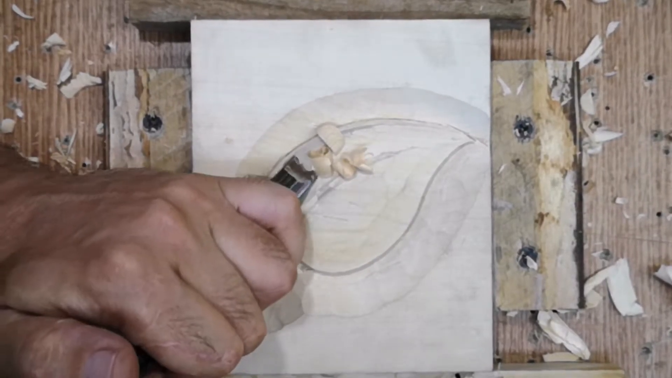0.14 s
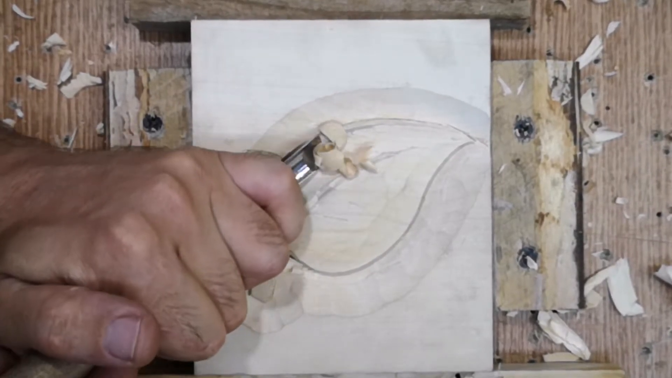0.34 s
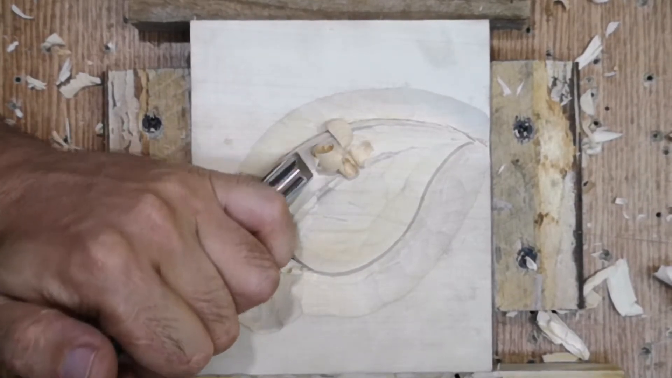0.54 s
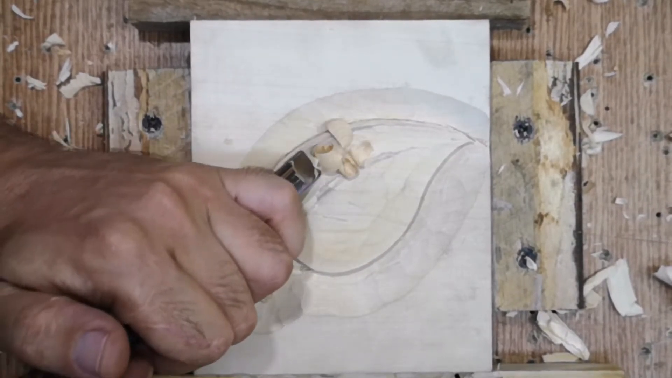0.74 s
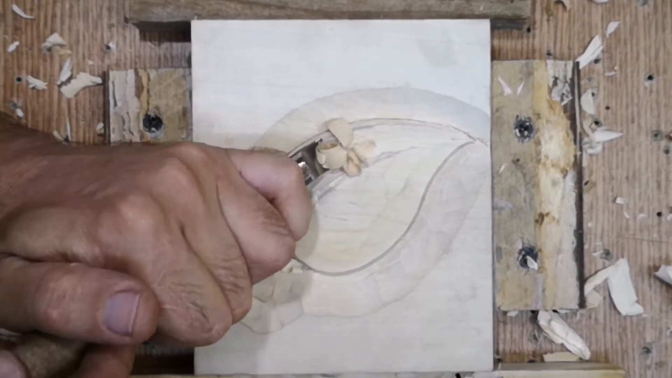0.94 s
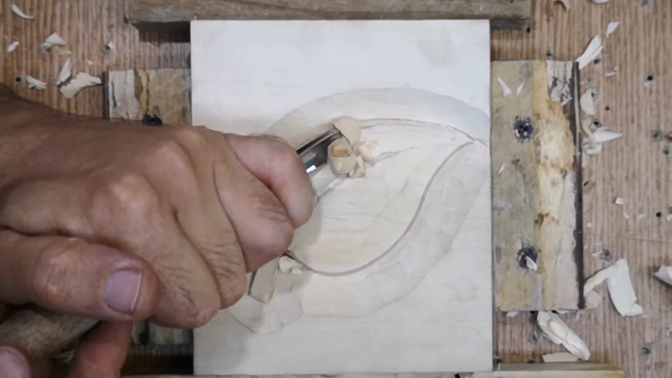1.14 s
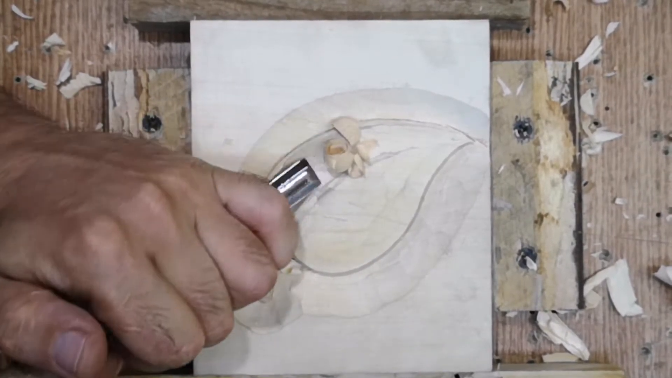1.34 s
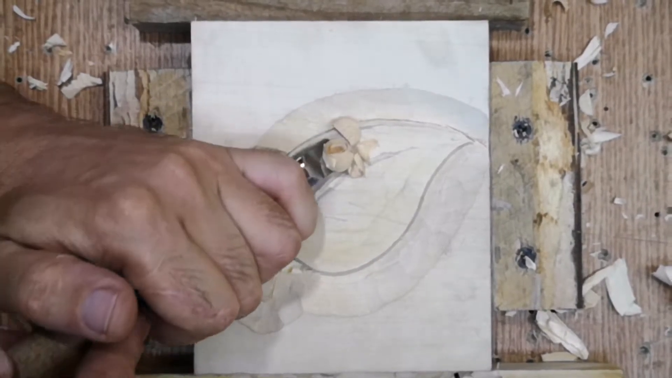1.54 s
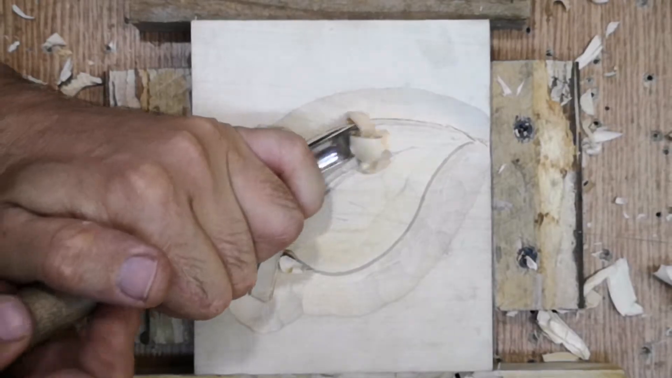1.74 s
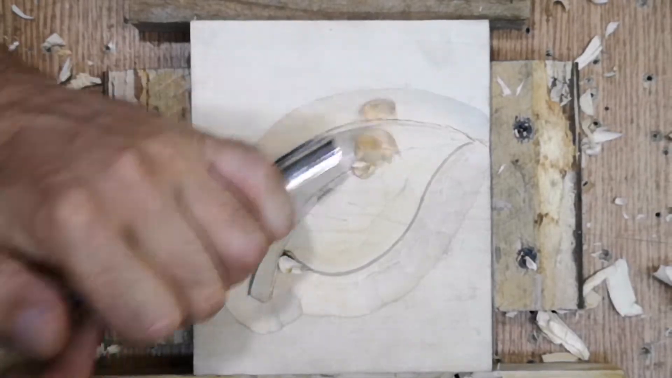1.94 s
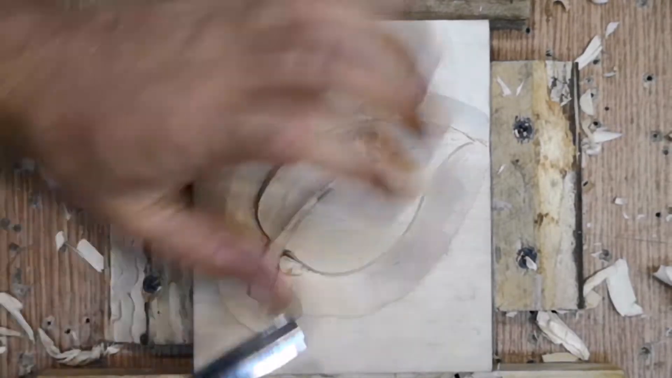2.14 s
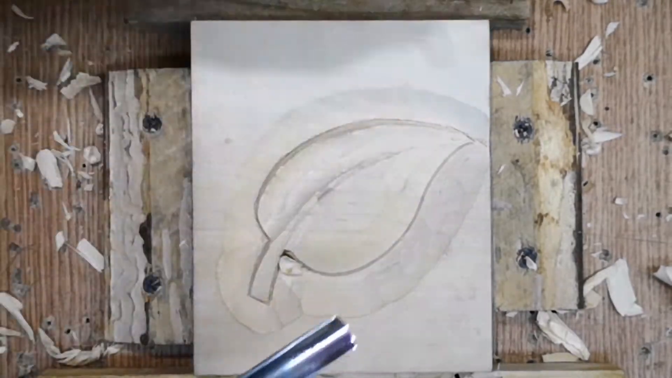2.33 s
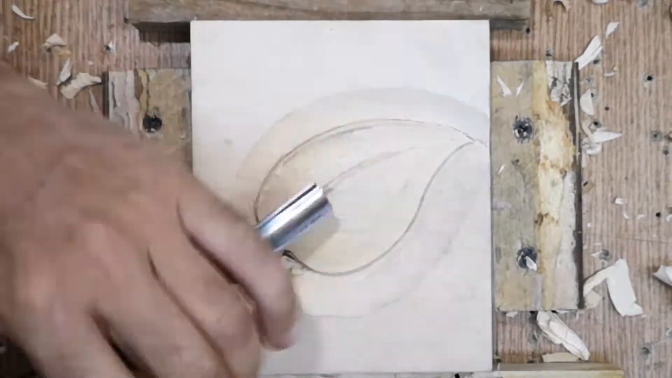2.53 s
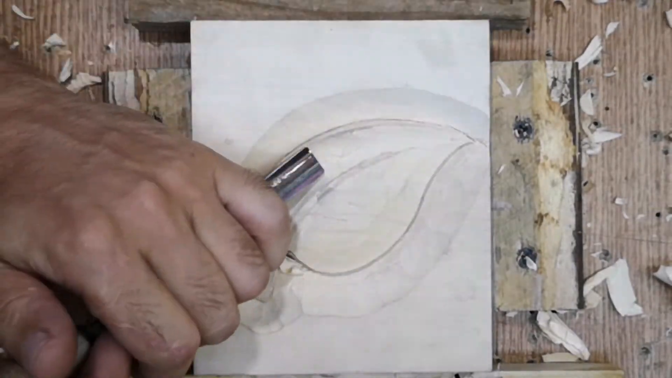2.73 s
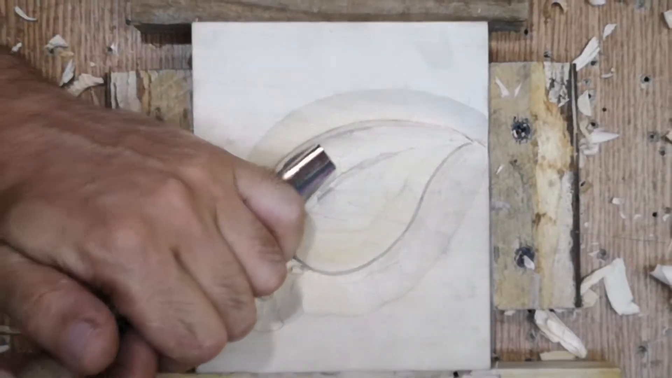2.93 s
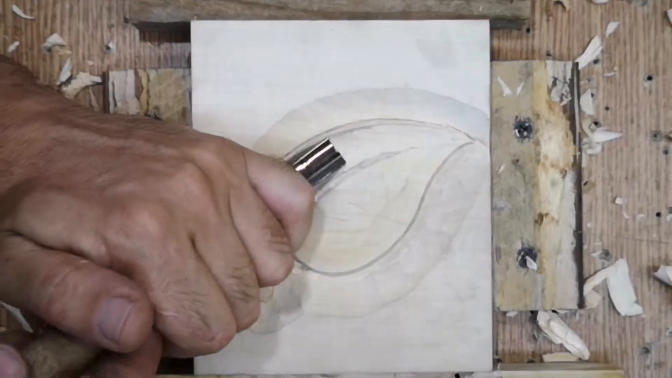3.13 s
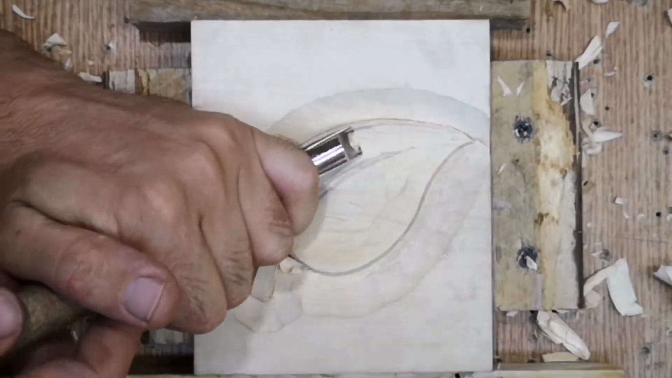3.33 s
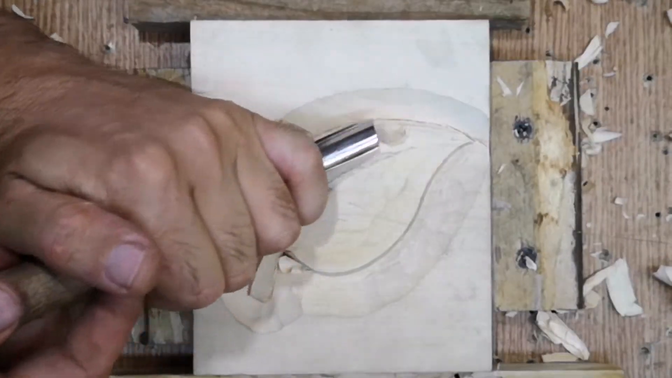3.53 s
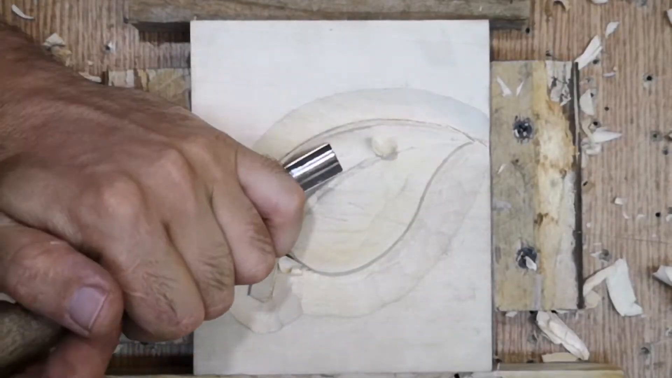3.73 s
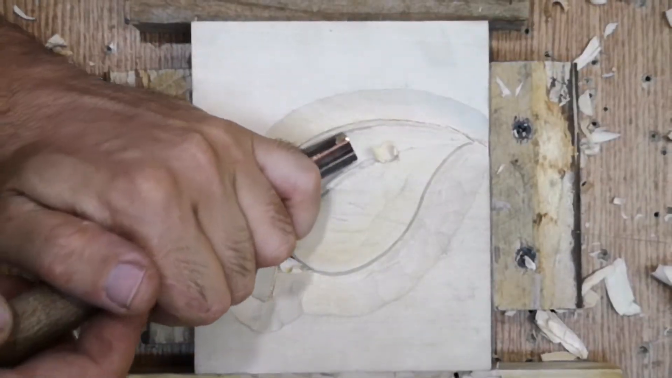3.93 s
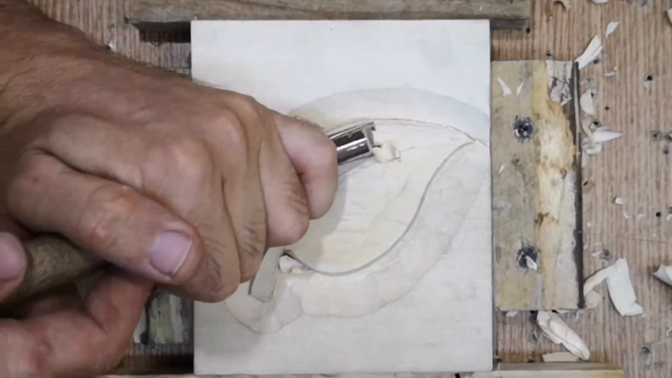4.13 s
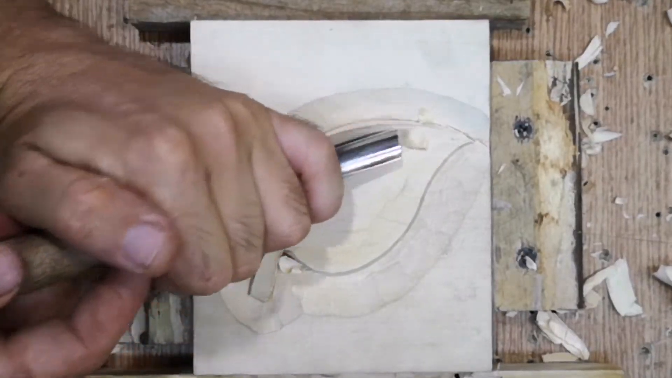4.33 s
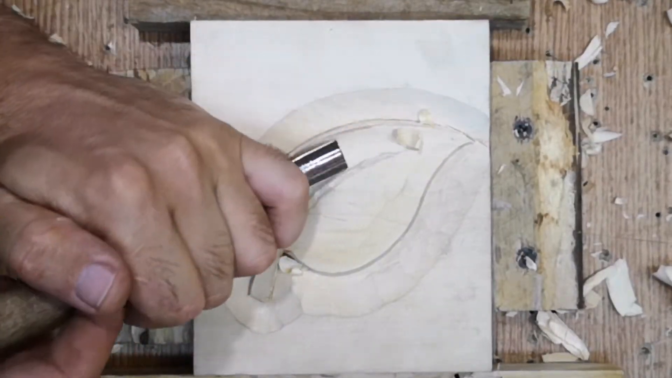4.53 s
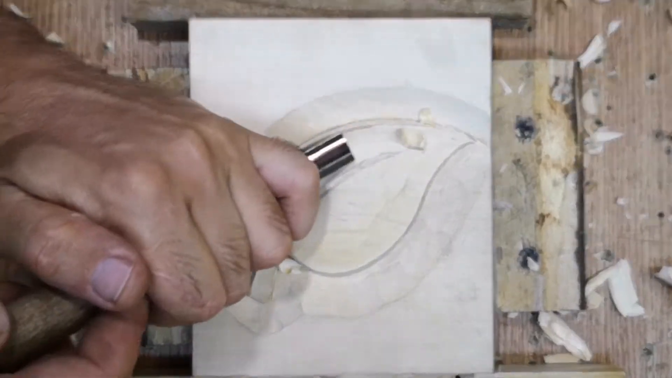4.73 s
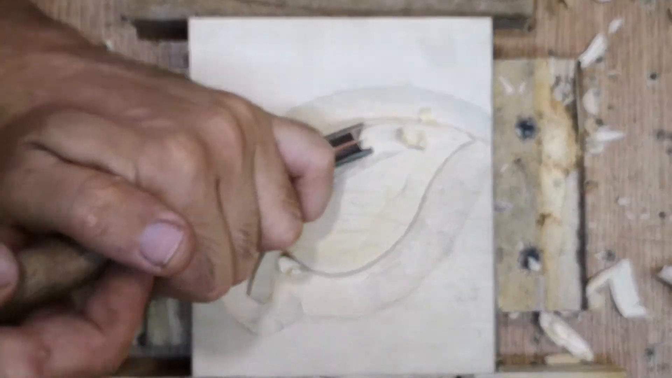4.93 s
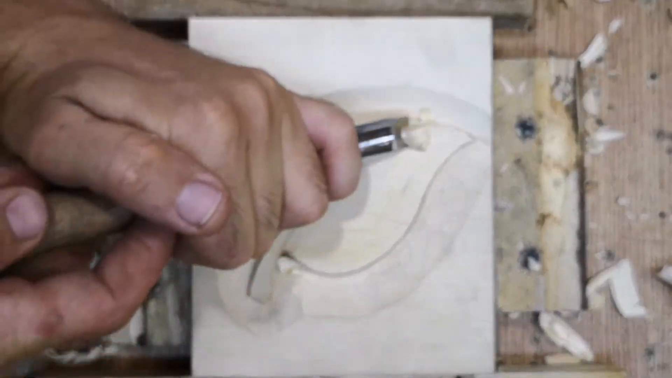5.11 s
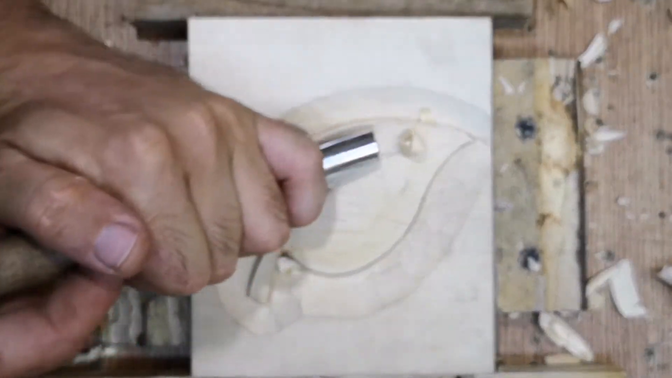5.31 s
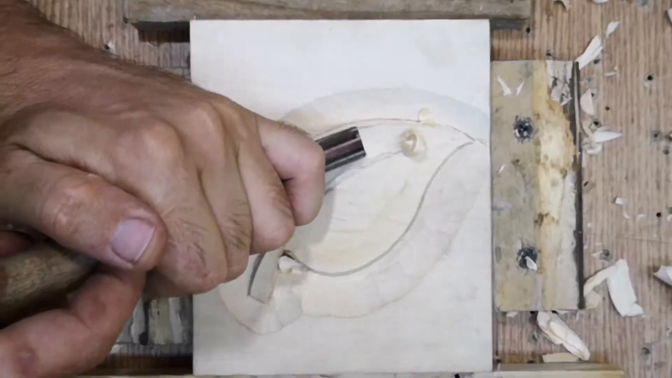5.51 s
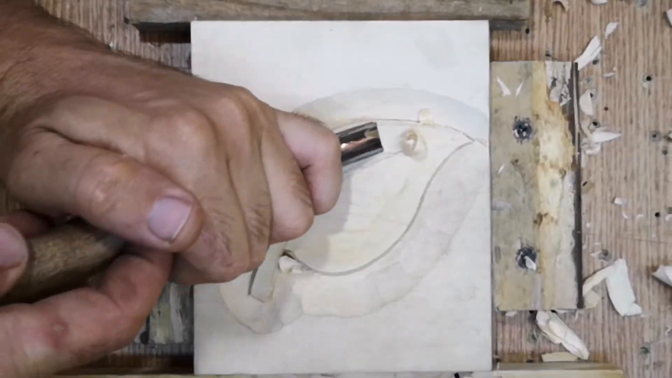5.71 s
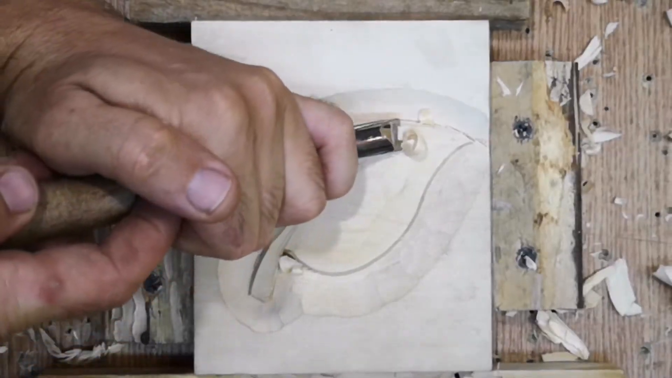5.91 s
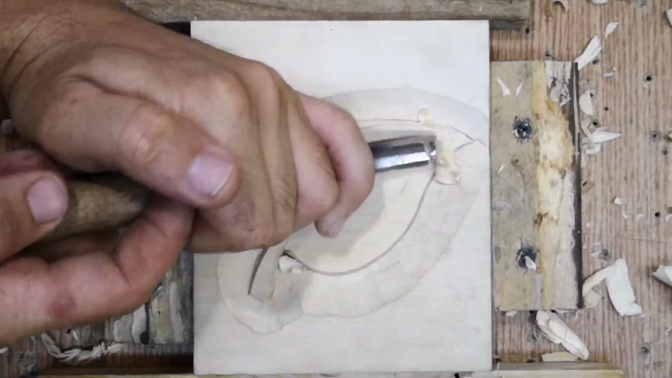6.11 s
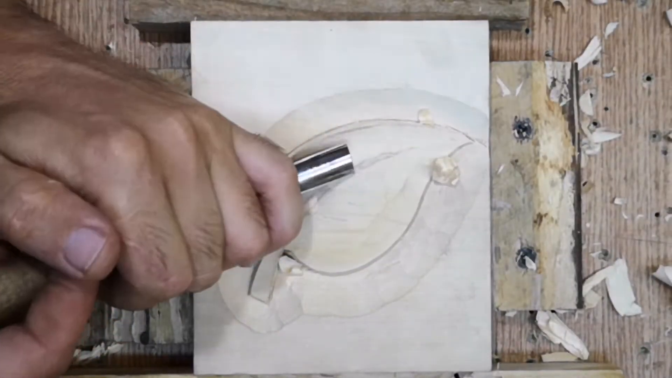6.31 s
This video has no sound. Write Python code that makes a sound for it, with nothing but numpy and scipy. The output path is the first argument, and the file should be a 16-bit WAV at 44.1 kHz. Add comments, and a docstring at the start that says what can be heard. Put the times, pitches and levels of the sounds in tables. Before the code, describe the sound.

A gouge rasps through soft wood in short crunchy pushes, with woody knocks between, a clumsy low bench thump and ticking chips, in a small quiet workshop.

```python
"""Short, rasping pushes of a gouge through a soft wood panel, clamped to a bench in a small workshop.
In each push, dense tiny fibre snaps ring the panel and the blade while the bench shudders.
Between pushes the tool knocks as it is set down; chips tick, and jolts of the hand shake the bench.
A finger brushes shavings away, the hand rustles on the handle, and near walls add a little echo
over a quiet background."""
import sys
import numpy as np
from scipy import signal
from scipy.fft import rfft, irfft
from scipy.io import wavfile
from scipy.ndimage import uniform_filter1d

SR = 44100
rng = np.random.default_rng(int(sys.argv[2]) if len(sys.argv) > 2 else 0)


def inscribe(sig):
    """Save sig as 16-bit PCM at rate SR to the path in sys.argv[1].

    A 1-D sig is mono; a 2-D sig holds one channel per row.
    Samples are clipped to [-1, 1] before scaling.
    """
    pcm = np.round(np.clip(np.atleast_2d(sig).T, -1, 1) * 32767)
    wavfile.write(sys.argv[1], SR, pcm.astype(np.int16))


N = 280476
TIME = np.arange(N) / SR
BLOW = TIME[:SR // 2]   # half a second, enough for one short event

# Pushes of the gouge. Each row: touch in seconds, then slide, bite and hold lengths in seconds,
# cut level in dB, change over the hold in dB, fade length in seconds,
# then relative levels of panel body, fibre tearing and bench sway in dB.
PUSHES = [(0.12, 0.11, 0.068, 0.043, -42, -1.5, 0.18, -0.5, -8, -8.5),
          (0.299, 0.04, 0.05, 0.067, -40.5, 0.5, 0.25, -5.5, -9, 1),
          (0.884, 0.084, 0.037, 0.044, -54, 0, 0.22, 3.5, -5, -8.5),
          (1.05, 0.046, 0.013, 0.15, -48, -7.5, 0.15, -3.5, -3.5, 6),
          (1.683, 0.12, 0.08, 0.12, -41, -6, 0.19, -0.5, -7.5, -6.5),
          (3.175, 0.2, 0.1, 0.072, -46, 5, 0.082, 1.5, -5.5, 3),
          (4.052, 0.14, 0.089, 0.04, -45.5, -0.5, 0.071, 2, -8.5, -2),
          (4.875, 0.14, 0.075, 0.11, -43.5, 3.5, 0.11, 1.5, -9, -1),
          (5.843, 0.15, 0.036, 0.11, -53, -2, 0.063, -1, -8, -3),
          (6.136, 0.037, 0.026, 0.012, -52.5, -1.5, 0.15, 6, -11, -1.5)]
# Ways the panel vibrates. Each row: pitch in Hz, relative level when scraped in dB, when struck in dB,
# time to fall 60 dB in seconds, left-right difference in dB, lead of the left side in radians.
PANEL_MODES = [(186.3, 5, -13.5, 0.22, 1.5, -0.34), (276.6, 2.5, -11.5, 0.19, 0.5, -0.5),
               (321, -5, -16, 0.046, -2.5, 0.75), (485, -1, -31, 0.053, -1, 1.72),
               (575.4, 2, -16.5, 0.075, 9.5, 2.5), (822, -8.5, -13.5, 0.039, 4, 0.5),
               (1008, 3, -11, 0.045, 7, 1.5), (1199, 2, -22.5, 0.063, 2.5, 0.55),
               (1280, -13, -18.5, 0.048, -9, 0.9), (1560, 0, -22, 0.073, -2, 1),
               (1705, 1.5, -17, 0.052, -5, 1.43), (1825, 0, -8.5, 0.037, 6.5, 1.6),
               (1962, 0.5, -19, 0.032, -8, -2.4), (2092, 2, -18, 0.052, 0.5, -0.26),
               (2236, 1, -19, 0.054, 7, 2), (2400, 0, -16, 0.021, 9.5, 2.34),
               (2600, -1.5, -24, 0.034, 7, 2), (3660, -29, -21.5, 0.054, -5, 3)]


def from_db(db):
    """Turn decibels into gain."""
    return 10 ** (np.asarray(db) / 20)


def rms_one(x):
    """Scale a sound to an average power of one."""
    return x / np.sqrt(np.mean(x ** 2) + 1e-20)


def at_hz(points, hz):
    """Read a table between its points, with pitch on a logarithmic axis."""
    f, value = np.transpose(points)
    return np.interp(np.log(np.maximum(hz, 1)), np.log(f), value)


def band(x, low_hz, high_hz):
    """Keep the part of a sound between two frequencies."""
    edges_hz = [low_hz, min(high_hz, SR / 2 - 1)]
    return signal.sosfilt(signal.butter(2, edges_hz, "band", fs=SR, output="sos"), x)


def pan(db):
    """Left and right gains for a level difference in dB."""
    return from_db(np.array([[db], [-db]]) / 2)


def add(out, s, sound):
    """Mix a sound in, starting at a time in seconds."""
    at = round(s * SR)
    out[:, at:at + sound.shape[-1]] += sound[..., :N - at]


def noise(length=N):
    """Two unrelated channels of plain hiss."""
    return rng.standard_normal((2, length))


def drift(per_s):
    """A random wandering with a spread of one, given its new values per second."""
    return rms_one(np.interp(TIME * per_s, np.arange(N), rng.standard_normal(N)))


def colour(pair, spectrum):
    """Turn two unrelated signals into left and right: shaped in tone, and alike in the bass."""
    # Each row: frequency in Hz, likeness of left and right from 0 to 1.
    likeness = [(60, 1), (130, 0.9), (290, 0.7), (640, 0), (3000, 0.062), (15000, 0)]
    mid, side = rfft(pair)
    hz = np.linspace(0, SR / 2, len(mid))
    alike = np.clip(at_hz(likeness, hz), -.99, .99)
    both = np.sqrt(1 + alike) * mid + np.sqrt(1 - alike) * side * [[1], [-1]]
    return rms_one(irfft(both * from_db(at_hz(spectrum, hz)), pair.shape[-1]))


def swell(s, half_s, db):
    """A smooth rise and fall of gain; half_s leads from the top down to about a third."""
    return from_db(db) * np.exp(-((TIME - s) / half_s) ** 2)


def push(contact_s):
    """A soft contact: a smooth bump of force with a total of one."""
    bump = np.sin(np.pi * np.minimum(BLOW / contact_s, 1)) ** 2
    return bump / bump.sum()


def ring(force, hz, t60):
    """A force sets a fading sine ringing; a unit click gives height one."""
    r, w = from_db(-60 / (t60 * SR)), 2 * np.pi * hz / SR
    return signal.lfilter([0, np.sin(w)], [1, -2 * r * np.cos(w), r * r], force + 1e-18)


def resonate(force, hz, t60):
    """Complex motion of one vibration driven by a force, with unit gain at its own pitch."""
    r = from_db(-60 / (t60 * SR))
    return signal.lfilter([1 - r], [1, -r * np.exp(2j * np.pi * hz / SR)], force + 1e-18)


def ports(motion, side_db, lead_rad):
    """A vibration reaches left and right with different level and phase."""
    return pan(side_db) * np.real(motion * np.exp(.5j * lead_rad * np.array([[1], [-1]])))


def fibres(per_s, size_db, judder_db, judder_per_s):
    """Tiny ruptures of uneven size, in stronger and weaker bunches as contact catches and slips."""
    born = rng.random((2, N)) < per_s / SR
    sizes = from_db(size_db * np.minimum(rng.exponential(1, (2, N)), 4))
    signs = rng.choice([-1, 1], (2, N))
    return born * sizes * signs * from_db(judder_db * drift(judder_per_s))


def effort(touch, slide_s, bite_s, hold_s, cut_db, swell_db, fade_s):
    """One push in dB relative to a full cut: the edge touches, slides, bites in, holds and fades."""
    touch_s, full_cut_db = 0.041, -41
    silent_db, slide_db, fade_db = -72, -60, 45.5
    press_db = 27.5 * slide_s   # a longer slide builds up more pressure
    lengths = [0, min(touch_s, slide_s), max(slide_s - touch_s, 0), bite_s, hold_s, fade_s]
    corners = touch + np.cumsum(lengths)
    end_db = cut_db + swell_db
    levels = [silent_db, slide_db, slide_db + press_db, cut_db, end_db, end_db - fade_db]
    return np.interp(TIME, corners, levels, left=-np.inf, right=-np.inf) - full_cut_db


def bench(force):
    """The heavy top answers a force with a few low vibrations."""
    # Each row: pitch in Hz, relative level in dB, time to fall 60 dB in seconds.
    bench_modes = [(59, -5.5, 0.95), (67.44, 4.5, 0.85), (104.7, -2, 0.26), (188.6, -19, 0.35)]
    return sum(from_db(db) * ring(force, hz, t60) for hz, db, t60 in bench_modes)


def hush(level_db=-52):
    """The quiet workshop: steady noise, strongest in the bass."""
    # Each row: frequency in Hz, relative level in dB per Hz.
    hush_tone = [(12, -44), (20, 10), (40, -12.5), (66, -4.5), (123, -19), (310, -20.5), (357, -26.5),
                 (738, -30.5), (1660, -29.5), (2460, -29.5), (3340, -34.5), (16000, -47)]
    return from_db(level_db) * colour(noise(), hush_tone)


def workshop(x, build_up_s=0.0065):
    """Dense echoes from near walls: fading noise in eight-edged bands, each with its own decay."""
    # Each row: frequency in Hz, time for the echo to fall 60 dB in seconds.
    echo_t60 = [(250, 0.15), (1000, 0.13), (4000, 0.15), (8000, 0.11)]
    edges = np.geomspace(200, 16000, 8)
    air = colour(noise(len(BLOW)), [(100, 0), (16000, 0)])
    tail = 0
    for low, high in zip(edges, edges[1:]):
        t60 = at_hz(echo_t60, np.sqrt(low * high))
        tail = tail + band(air, low, high) * from_db(-60 * BLOW / t60)
    tail *= np.minimum(BLOW / build_up_s, 1) ** 2
    return signal.fftconvolve(x, tail / np.sqrt(np.sum(tail ** 2) / 2), axes=1)[:, :N]


def grip(gain_db=3.0):
    """The hand rustles faintly on the handle: noise that swells and fades."""
    # Each row: middle in seconds, half length in seconds, relative level in dB.
    shifts = [(0.593, 0.025, -65.5), (1.5, 0.34, -67), (2.188, 0.13, -64), (3.085, 0.23, -67),
              (6.268, 0.073, -60.5)]
    # Each row: frequency in Hz, relative level in dB per Hz.
    rustle_tone = [(300, -9), (1000, -13), (2000, 8), (3300, 1), (8000, -1.5), (11000, -13.5), (15500, -12)]
    return from_db(gain_db) * sum(swell(*shift) for shift in shifts) * colour(noise(), rustle_tone)


def brush(gain_db=11.5):
    """A finger sweeps shavings across the grain in a flurry of tiny catches."""
    # Each row: firmest contact in seconds, half length in seconds, relative level in dB.
    sweeps = [(2.342, 0.019, -65), (2.381, 0.026, -49.5)]
    # Skin on wood. Each row: frequency in Hz, relative level in dB per Hz.
    skin_tone = [(300, 13), (2200, 6.5), (4000, -3.5), (8500, -1), (11500, -14.5), (15500, -18)]
    rub = fibres(per_s=2500, size_db=1.5, judder_db=1.5, judder_per_s=110)
    return from_db(gain_db) * sum(swell(*sweep) for sweep in sweeps) * colour(rub, skin_tone)


def chips(gain_db=-8.5, tick_t60=0.0024, body_db=2.5, ping_t60=0.007):
    """A dry chip breaks or lands: a tick, brief splintering, its own pitch and some lower body."""
    # Each row: start in seconds, then relative levels in dB of the whole, the body and the first tick,
    # pitch in Hz, relative level of the pitch in dB, time to fall 60 dB in seconds.
    chip_events = [(1.106, -41, -6, -9, 2550, 6, 0.06), (1.955, -22.5, -5, 4, 6740, -10, 0.051),
                   (2.417, -37.5, -1.5, 19, 1880, 3, 0.037), (2.504, -36, -19, 4, 7040, -5, 0.056),
                   (2.51, -28.5, -6, -9, 5100, 0, 0.036), (2.5164, -32, -6, -15, 8870, 3.5, 0.052),
                   (2.586, -45, -2.5, 3, 7900, -2, 0.048), (2.6342, -49, 1.5, 12.5, 2600, 9, 0.069),
                   (2.7437, -37, -24, -4, 2490, 1, 0.095)]
    # Each row: frequency in Hz, relative level in dB per Hz.
    chip_tone = [(1500, -20), (3500, -2.5), (5500, 3.5), (8500, 7), (10500, -12), (15500, -42)]
    out = np.zeros((2, N))
    for s, db, body, tick_db, pitch_hz, ping_db, t60 in chip_events:
        splinters = noise(len(BLOW))
        ping = from_db(ping_db) * rms_one(resonate(splinters, pitch_hz, ping_t60).real)
        low_body = from_db(body + body_db) * rms_one(band(splinters, 1380, 2810))
        snap = colour(splinters, chip_tone) + ping + low_body
        dying = from_db(-60 * BLOW / t60) + from_db(tick_db - 60 * BLOW / tick_t60)
        add(out, s, from_db(db + gain_db) * dying * snap)
    return out


def jolts(peak_db=-3.5, rattle_db=-14.0, stilled_s=2.472, stilling_s=0.08):
    """The hand lurches against the bench, and the clamps rattle dully while it sways."""
    # Each row: start in seconds, relative level in dB, contact length in seconds.
    lurches = [(1.945, -12.5, 0.0045), (1.957, -3.5, 0.0072), (2.128, -20.5, 0.0029),
               (2.327, -11.5, 0.0029), (2.373, -21.5, 0.0023), (2.41, -14.5, 0.005)]
    force = np.zeros((1, N))
    for s, db, contact_s in lurches:
        add(force, s, from_db(db) * push(contact_s))
    # the hand comes to rest on the work again and damps the swaying
    sway = bench(force) * np.exp(-np.maximum(TIME - stilled_s, 0) / stilling_s)
    sway *= from_db(peak_db) / np.abs(sway).max()
    rattle = colour(noise(), [(30, 0.5), (100, 14.5), (160, -4.5), (300, -9.0), (450, -15.5),
                              (1000, -26.0), (4000, -40.5), (12000, -54)])
    return sway + from_db(rattle_db) * uniform_filter1d(np.abs(sway), size=700) * rattle


def shudder(sway_db=-23.0, sway_follows=1.43, rebound_hz=62, rebound_db=-1.5, rebound_s=0.059):
    """The uneven push of the cut keeps the bench swaying, and it swings back when a push lets go."""
    # Each row: widest swing in seconds, relative level in dB.
    rebounds = [(0.56, -27.5), (1.33, -38.5), (3.636, -27), (4.44, -35), (5.35, -36), (6.27, -38.5)]
    sway = bench(colour(noise(), [(25, 8.0), (42, 1.0), (60, 1), (108, -0.5), (135, -12.5)]))
    sway /= np.sqrt(uniform_filter1d(sway[0] ** 2, size=1100) + 1e-9)   # even out the loudness
    # the sway changes by sway_follows dB for each dB of the cut
    pushed = np.max([from_db(sway_follows * effort(*shape) + db) for *shape, _, _, db in PUSHES], axis=0)
    swing = np.sin(2 * np.pi * rebound_hz * TIME + 1.4 * drift(25))
    swinging_back = swing * sum(swell(s, rebound_s, db) for s, db in rebounds)
    return from_db(sway_db) * pushed * sway + from_db(rebound_db) * swinging_back


def struck_panel(bright_db, thud_db, upper_db, hand_damping_db_per_s=312):
    """A blow sets all panel vibrations ringing; the resting hand shortens them."""
    hz, _, mode_db, t60, lean_db, lead_rad = np.transpose(PANEL_MODES)
    weight = (hz > 1400) * bright_db + (hz < 400) * thud_db
    weight += (hz > 1150) * (hz < 1400) * upper_db
    uneven_db = rng.normal(0, 1, len(hz))
    strength = from_db(mode_db + weight + uneven_db) * rng.choice([-1, 1], len(hz))
    dying = from_db(-(60 / t60[:, None] + hand_damping_db_per_s) * BLOW)
    motion = strength[:, None] * dying * np.exp(2j * np.pi * hz[:, None] * BLOW)
    return sum(ports(*mode) for mode in zip(motion, lean_db, lead_rad))


def knock(pitch_hz, bright, thud, upper, side_db, attack_s=0.0013, tap_t60=0.021, partner=1.16,
          partner_db=-17.0, overtone=1.97, overtone_db=6.0, bright_db=10.0, thud_db=12.5,
          crack_db=-16.0, crack_t60=0.079, click_db=12.5):
    """A woody tap, a noisy crack, the ringing panel and a bench thud make one landing of the tool."""
    tone = struck_panel(bright + bright_db, thud + thud_db, upper)
    turn = 2 * np.pi * pitch_hz * BLOW
    tap = np.sin(turn) - from_db(partner_db) * np.sin(partner * turn)
    tap += from_db(bright + overtone_db) * np.sin(overtone * turn)
    tap *= from_db(-60 * BLOW / tap_t60)
    grit = noise(len(BLOW)) * from_db(-60 * BLOW / crack_t60)
    low_crack = 4 * band(band(grit[0], 535, 1290), 597, 1450)
    high_crack = from_db(bright + click_db) * band(band(grit, 1600, 4200), 1400, 4160)
    crack = low_crack + high_crack
    landing = 1 - np.exp(-BLOW / attack_s)   # softens the very first moment
    click = landing * (pan(side_db) * (tap + from_db(crack_db) * crack) + tone)
    return click + from_db(thud - 115 * BLOW) * bench(push(0.0036))


def knocks(gain_db=4.0):
    """The tool is set down on the panel again between pushes."""
    # Each row: start in seconds, relative level in dB, strongest pitch in Hz,
    # then relative brightness, thud and woody upper ring in dB, left-right difference in dB.
    landings = [(0.691, -23.5, 860, -27, -18.5, -15, 4.5), (1.409, -22.5, 900, -21, -14.5, 12, 6.5),
                (1.509, -36, 880, -23, -12, -11, 3), (1.57, -48, 975, -33, -18, -5, 12),
                (1.959, -17.5, 980, -18, -8.5, -3.5, 10), (2.3313, -26.5, 730, -21.5, -1, 2, 2.5),
                (2.843, -33.5, 795, -26, -3, -2, 6), (2.8923, -25.5, 966, -22.5, -14.5, 3, 3.5),
                (3.85, -33.5, 850, -37, -13.5, -15, 5.0), (3.871, -28.5, 966, -24.5, -19, -13, 4),
                (3.933, -41.5, 980, -24, -11.5, -9, 4), (4.6142, -25.5, 846, -27, -16, -10, 2.5),
                (4.682, -35.5, 960, -31, -9.5, -3, 6), (4.724, -28.5, 994, -19.5, -19, 6.5, 5),
                (5.238, -30.5, 994, -26, -13.5, 4, 4), (5.539, -19.5, 1006, -16.5, -18, 2.5, 4),
                (5.665, -31.5, 1008, -28, -16, -5, 4), (6.111, -32, 1030, -28, -16, -1, 7),
                (6.179, -36, 1006, -13, -22, 10.5, 14)]
    out = np.zeros((2, N))
    for s, db, pitch_hz, bright, thud, upper, side_db in landings:
        add(out, s, from_db(gain_db + db) * knock(pitch_hz, bright, thud, upper, side_db))
    return out


def cutting(rasp_db=-38.5, rasp_brightens=0.06, tear_db=-42.0, tear_follows=1.15, tear_pan_db=2.0,
            blade_db=-9.5, blade_follows=0.86, blade_t60=0.15, shift_db=1.94, shift_per_s=22):
    """Ruptures ring the panel and the steel blade, and also sound straight from the edge."""
    # Faint rings of the blade. Each row: pitch in Hz, relative level in dB.
    blade_rings = [(4050, 8.5), (5820, 7), (6610, -13), (7900, 8.5)]
    # Direct sound of the fibres. Each row: frequency in Hz, relative level in dB per Hz.
    tear_tone = [(300, -24), (700, 6.5), (1400, 0.5), (2000, 1), (2700, 8), (3200, -1), (4600, -1.5),
                 (5700, 1.5), (6500, -4), (8300, 0), (9800, -9), (11500, -17), (15500, -21)]
    snaps = fibres(per_s=3200, size_db=1.5, judder_db=1.44, judder_per_s=90)
    force = band(snaps[0], 160, 4500)
    # at each moment the strongest push counts
    rasping = np.max([from_db(effort(*shape)) for *shape, _, _, _ in PUSHES], axis=0)
    leaning = np.max([from_db(effort(*shape) + db) for *shape, db, _, _ in PUSHES], axis=0)
    tearing = np.max([from_db(tear_follows * effort(*shape) + db) for *shape, _, db, _ in PUSHES], axis=0)

    steady = panel = 0
    for k, (hz, db, _, t60, side_db, lead_rad) in enumerate(PANEL_MODES):
        # as the edge travels over the panel it favours now one vibration, now another
        favour = (-1) ** k * from_db(db + shift_db * drift(shift_per_s))
        mode = favour * ports(resonate(force, hz, t60), side_db, lead_rad)
        # low ones follow the body level; a deeper cut brings out the higher ones
        drive = leaning if hz < 700 else rasping ** ((hz / 2000) ** rasp_brightens)
        steady, panel = steady + mode, panel + drive * mode
    panel /= np.std(band(steady, 1600, 2900))

    edge = colour(snaps, tear_tone)
    steel = 0
    for k, (hz, db) in enumerate(blade_rings):
        favour = (-1) ** k * from_db(db + shift_db * drift(shift_per_s))
        steel = steel + favour * ring(edge, hz, blade_t60)
    edge /= np.std(band(edge.mean(axis=0), 4000, 11000))
    # the blade stands out more while it slides; deep in the wood it is held back
    treble = tearing * edge + from_db(blade_db) * tearing ** blade_follows * rms_one(steel)
    return from_db(rasp_db) * panel + from_db(tear_db) * pan(tear_pan_db) * treble


def scene(cut_room_db=-9.0, knock_room_db=-4.0, chip_room_db=-3.0):
    """Everything happens close by, with a little room around the hand and tool sounds."""
    cut, knocking, chipping = cutting() + brush() + grip(), knocks(), chips()
    to_room = from_db(cut_room_db) * cut
    to_room = to_room + from_db(knock_room_db) * knocking + from_db(chip_room_db) * chipping
    return cut + knocking + chipping + shudder() + jolts() + workshop(to_room) + hush()


def record(dry, cutoff_hz=15700):
    """Loud peaks are gently rounded, and the highest treble is cut steeply."""
    rounded = .95 * np.tanh(dry / .95)
    return signal.sosfilt(signal.ellip(10, .1, 80, cutoff_hz, fs=SR, output="sos"), rounded)


dry = scene()
out = record(dry)
inscribe(out)
```